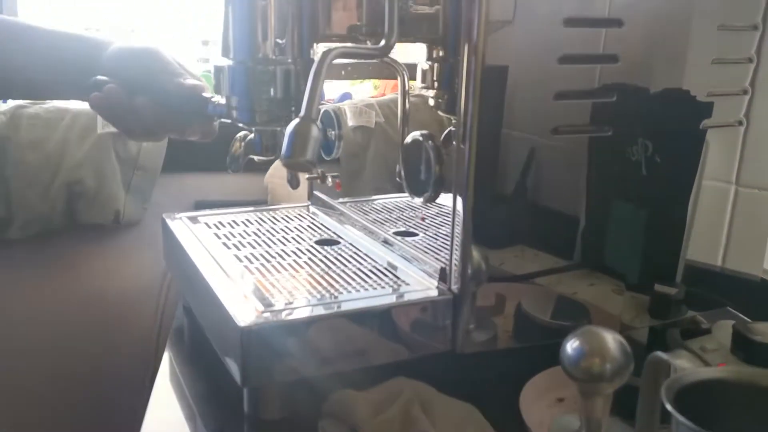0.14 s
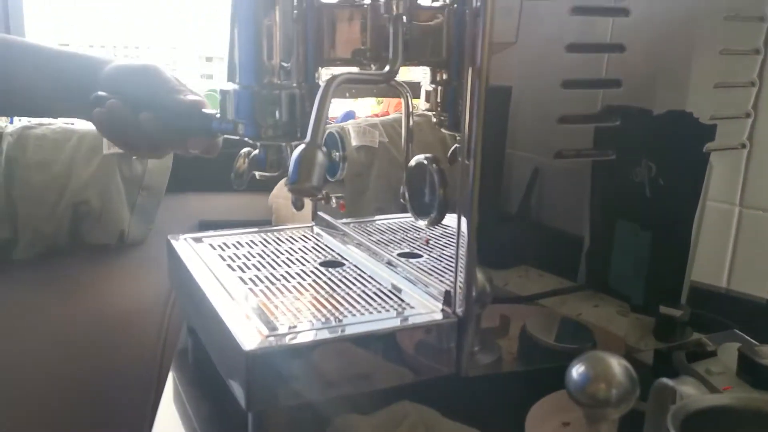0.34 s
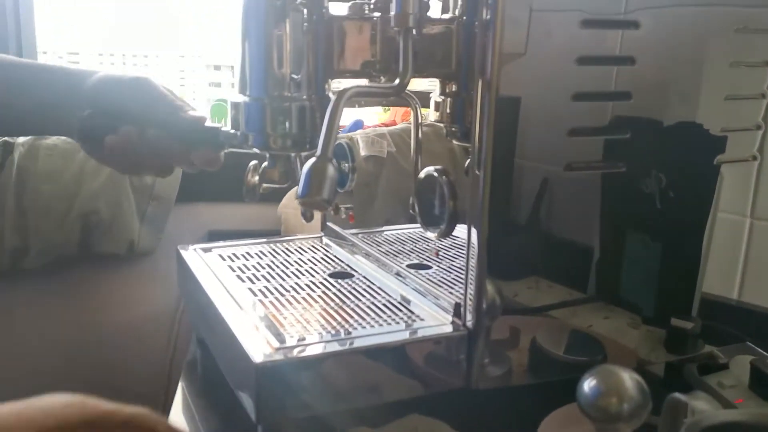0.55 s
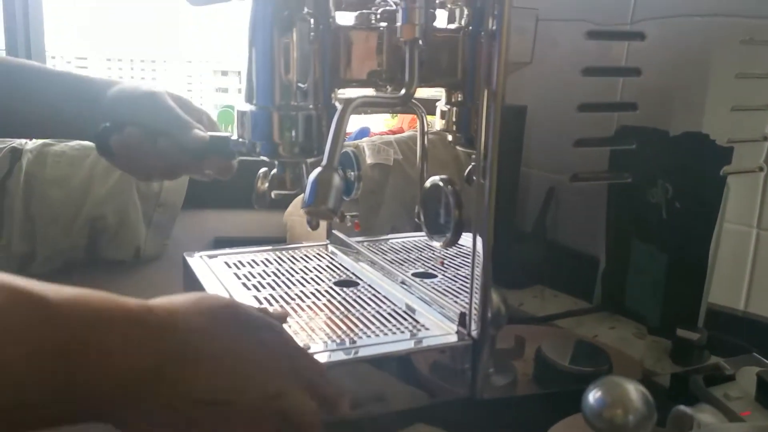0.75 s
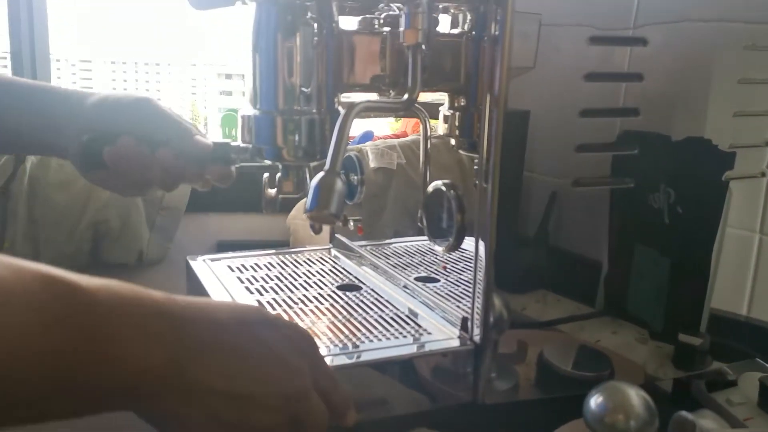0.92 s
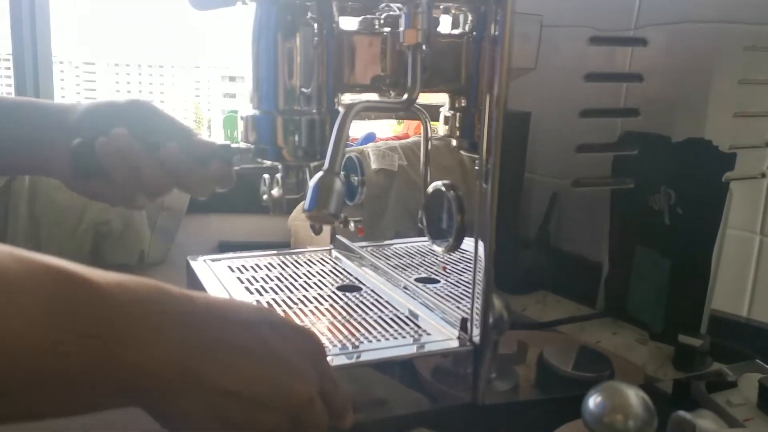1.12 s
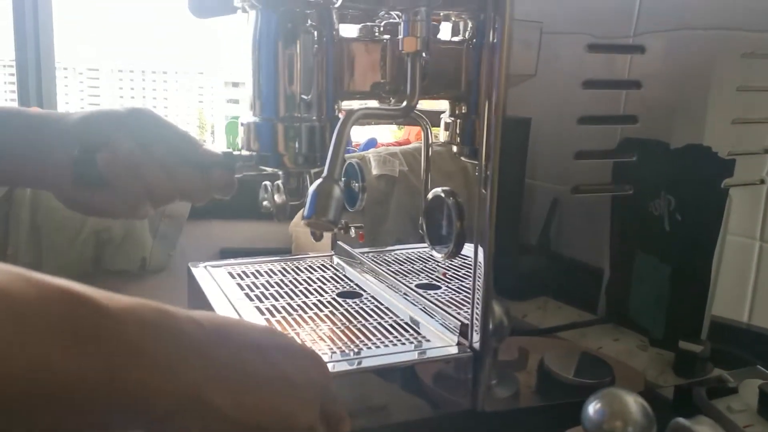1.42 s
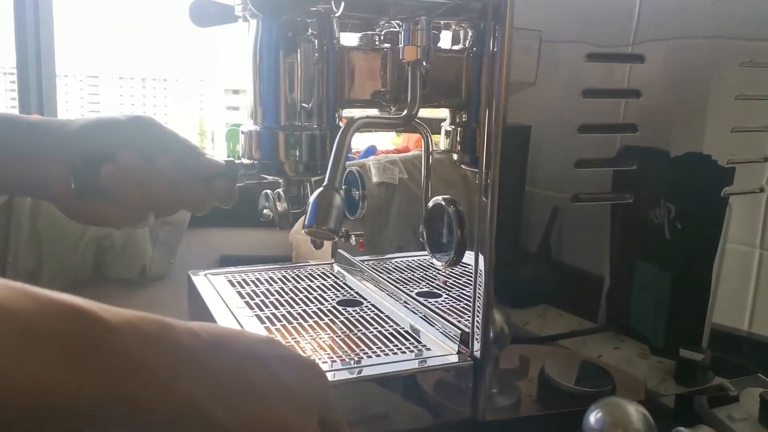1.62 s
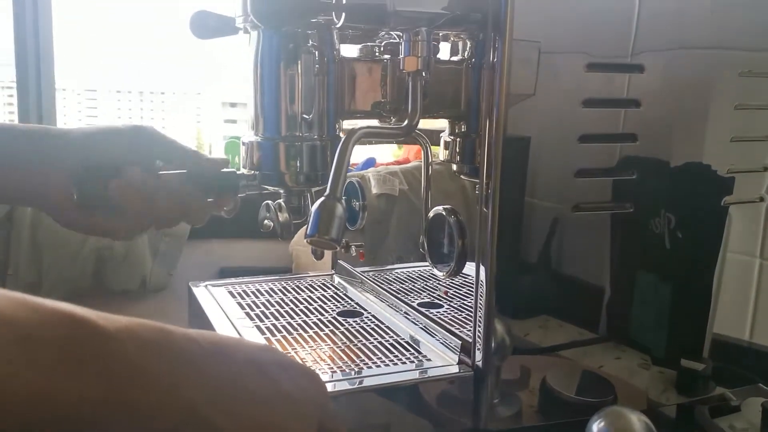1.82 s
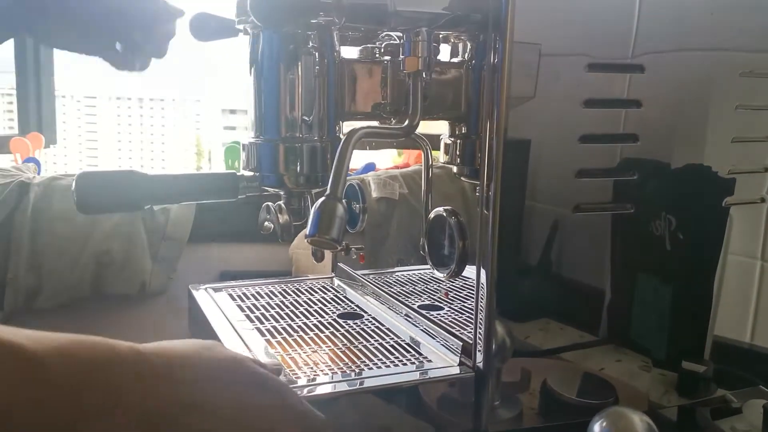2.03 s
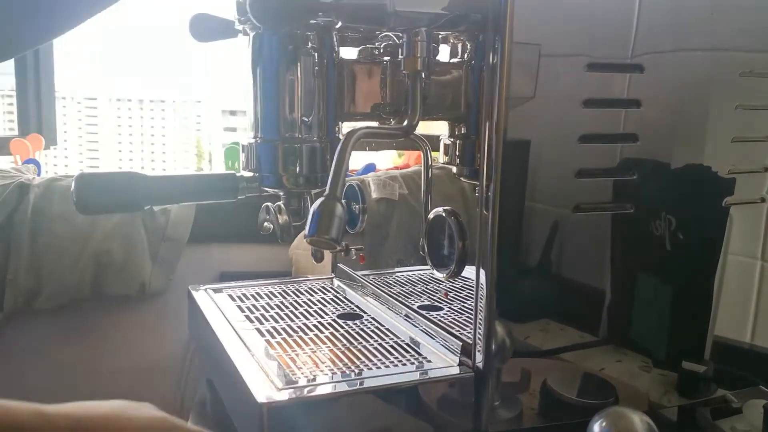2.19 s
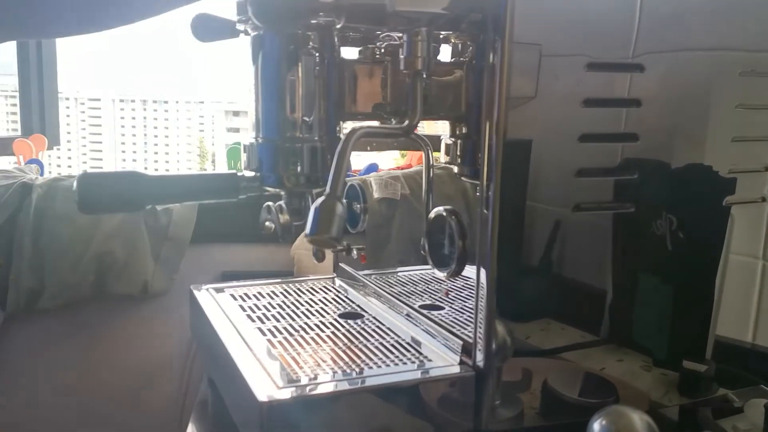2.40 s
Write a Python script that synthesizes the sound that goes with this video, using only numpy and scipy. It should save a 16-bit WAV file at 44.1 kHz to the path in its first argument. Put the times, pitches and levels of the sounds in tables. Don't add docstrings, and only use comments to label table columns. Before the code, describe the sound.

A brass portafilter being fitted to an espresso machine, close in stereo in a quiet kitchen. A light tick at 0.17 s, then a hard clunk at 0.23 and dense rattling to 0.35 with low case booms. At 0.52 it drops home, dull knocks following; soft gasket rubbing and tiny catches fade by 1.5. Dry finger ticks at 1.39 and 1.86, faint skin rustle near 2, town rumble throughout.

```python
import sys
import numpy as np
from scipy import signal
from scipy.fft import rfft, irfft, next_fast_len
from scipy.io import wavfile
from scipy.ndimage import uniform_filter1d, map_coordinates

SR = 44100
rng = np.random.default_rng(int(sys.argv[2]) if len(sys.argv) > 2 else 0)


def invert_db(x):
    u = np.asarray(x, float) / 20
    return 10 ** u


def waveform_to_disk(signal):
    frames = np.transpose(np.atleast_2d(signal))
    scaled = np.clip(frames, -1, 1) * 32767
    samples = np.round(scaled).astype(np.int16)
    wavfile.write(sys.argv[1], SR, samples)


N = 112454

# pitch_hz, level_db
TOWN_SPECTRUM = [(12, -59.5), (24, -3.5), (48, 1), (70, -7.5), (141, -6.5), (190, -6), (300, -8.5),
                 (489, -15), (1500, -27), (1950, -70), (3300, -120)]
# pitch_hz, level_db
AIR_SPECTRUM = [(800, -34.5), (1500, 5.5), (3000, -1.5), (5000, -6.5), (7300, -4), (8000, -7), (10500, 8.5),
                (15000, 1.5)]
# start_s (middle), spread_s, level_db
BIRD_CALLS = [
    (.09, 0.09, -77),
    (.45, 0.068, -79.5),
    (1.67, 0.038, -83),
    (1.91, 0.023, -78),
]
# start_s, peak_db, crack_share, brightness_db_per_octave
RIM_HITS = [
    (.1745, -39.5, 0.3, -11.5),
    (0.1765, -24.5, 0.47, 2.5),
    (.183, -38.5, .2, 1),
    (.19, -39, .3, -6.5),
]
# pitch_hz, level_db, t60_s
RIM_MODES = [(1315, -13, 0.074), (1510, -5.5, 0.054), (2400, -10, 0.026), (3430, -12, 0.05),
             (4190, -4, 0.062), (5490, -1, 0.025), (6546, -14, .05), (7900, -5, .03), (13800, 0, 0.021)]
# start_s, level_db, pitch_hz, t60_s
PANEL_PUSHES = [(.222, -39, 181, 0.45), (.226, -39.5, 250, 0.24), (.245, -38, 538, .2),
                (.265, -43.5, 96, 0.28), (.278, -31, 279, .12), (.3, -42.5, 421, 0.11),
                (.3, -37.5, 46, 0.24), (.315, -30, 185, 0.21), (0.339, -38, 273, 0.15),
                (0.377, -35, 193, 0.11), (.4, -42.5, 273, .15), (.41, -44.5, 201.3, 0.65),
                (0.421, -43, 86.5, .2), (.51, -40, 190, 0.12), (0.514, -39, 316, 0.083),
                (0.519, -37.5, 240, 0.11), (.55, -41.5, 285.2, 0.38), (0.589, -46.5, 170, 0.096),
                (.74, -47, 199.2, 0.32), (0.899, -45.5, 194, 0.24)]
# start_s, peak_db, crack_share, brightness_db_per_octave
SLOT_HITS = [(0.2237, -21, 1.2, -2), (.2345, -28, 1, 10), (.238, -26, .5, 3.5), (.243, -34, 1, -8),
             (0.251, -30, .6, -7), (0.2605, -19.5, 1, -0.5), (.2635, -28, .6, -1), (.2712, -31, 1, -1),
             (.2835, -19, 0.66, 2.5), (.294, -27.5, 1, -2.5), (.304, -28.5, 0.37, -1.5),
             (.316, -33, 0.37, -5.5), (.326, -35, .4, -6), (.338, -41, 0.5, -3.5), (.352, -40, .4, 0.5)]
# pitch_hz, level_db, t60_s
SLOT_MODES = [(538, -10, 0.07), (671, -3.5, 0.04), (923, -8.5, 0.048), (1204, -4, 0.061), (1391, -5, 0.054),
              (1639, -4.5, 0.046), (1894, -4, 0.05), (2080, -1, 0.039), (2380, -1, 0.047),
              (2824, -8.5, 0.091), (3280, -12.5, 0.063), (4100, -14, 0.082), (5320, -18, .04),
              (5900, -14, .04)]
# start_s, peak_db, crack_share, brightness_db_per_octave
HARD_BLOW = [
    (.2290, -8.5, 0.65, 0),
]
# pitch_hz, level_db, t60_s
LUG_MODES = [(566, -24, 0.039), (676, -2.5, 0.03), (906, -10, .06), (1360, -13.5, 0.067),
             (1410, -10.5, 0.028), (1897, -21, .04), (2120, -6, 0.045), (2294, 1.5, 0.032),
             (2350, -9, 0.029), (2760, -22, .035), (4090, -11, .07), (4630, -23, 0.027),
             (5100, -15.5, 0.069), (6611, -25, .04)]
# pitch_hz, level_db, t60_s
BASKET_MODES = [(9380, 4.5, .12), (10500, -4.5, .06), (11100, 4, .08), (11900, 2, .07), (12800, 1.5, .1),
                (13700, -5, .06), (14600, -4, .04)]
# start_s (middle), spread_s, level_db
SKIN_MOVES = [
    (.405, 0.027, -58),
    (1.5, 0.017, -62.5),
    (1.80, 0.037, -69),
    (1.955, 0.011, -56.5),
    (2.03, 0.066, -62),
]
# pitch_hz, level_db
SKIN_SPECTRUM = [(1200, -14), (2500, 10), (4000, -8), (7000, 3.5), (10000, 16.5), (14000, 10)]
# start_s, level_db
SLIDE_PRESSURE = [(0.519, -58), (0.62, -59.5), (0.768, -56), (.95, -55.5), (1.1, -61.5), (1.34, -60),
                  (1.43, -68), (1.55, -83)]
# pitch_hz, width_hz, level_db
GASKET_BANDS = [(2340, 250, -2), (4210, 310, 3.5), (5360, 310, -1.5), (6340, 800, -7.5), (9050, 1400, 1)]
# start_s (middle), spread_s, pitch_hz, width_hz, level_db
HAND_SQUEAK = (2.16, .06, 12200, 600, -56)
# start_s, peak_db, crack_share, brightness_db_per_octave
SEAT_HITS = [
    (0.5195, -16, 0.35, -0.7),
    (.5252, -23.5, 0.23, -9.5),
    (0.531, -35, 0.32, -4),
    (.538, -40, 0.55, 0),
    (0.548, -41, .4, 3),
    (0.564, -44, .4, -6),
    (0.8878, -44, 0.5, 6),
]
# pitch_hz, level_db, t60_s
SEAT_MODES = [(1255, -0.5, 0.078), (1310, -12, 0.07), (1498, 0.5, 0.032), (1760, -0.5, 0.022),
              (1920, -1.5, .05), (2110, -1, 0.044), (2398, 13, 0.013), (2550, -20, 0.056),
              (3080, -16, 0.0098), (3480, 1.5, 0.025), (3878, -4.5, .07), (4670, -9, 0.033),
              (6260, 1.5, 0.027), (6970, -2.5, 0.032)]
# start_s, peak_db
HANDLE_KNOCKS = [
    (.524, -38.5),
    (.536, -33),
    (.547, -33.5),
    (.558, -36),
    (.567, -38),
    (.58, -54),
    (0.754, -46),
    (.79, -45),
]
# pitch_hz, level_db, t60_s
HANDLE_MODES = [(410, -6, 0.052), (552, -1, 0.05), (741, 6.5, 0.046), (880, -5, 0.052), (977, -2, 0.06),
                (1144, 0, 0.039), (1373, -3, .05)]
# start_s, peak_db, pitch_hz, t60_s
CATCHES = [(0.7628, -40, 5360, 0.027), (0.821, -51, 2970, 0.027), (0.886, -44, 2147, 0.074),
           (.888, -44.5, 2400, 0.046), (0.89, -44.5, 1243, .12), (0.941, -45, 6000, .02),
           (1.4937, -56, 3860, 0.022), (1.79, -58, 6000, 0.018), (1.947, -51, 2610, .03),
           (1.954, -51.5, 6970, 0.039), (2.024, -54.5, 2530, 0.052), (2.03, -59, 5540, 0.037)]
TICK_TIMES = [1.389, 1.3883, 1.3922, 1.3929, 1.3918, 1.86]
# pitch_hz, peak_db, decay_cycles, left_over_right_db
TICKS = [
    (6500, -36, 1.5, -23),
    (2830, -44, 0.73, -6),
    (5880, -25.5, 1.45, -32),
    (2780, -31, 1.8, -36),
    (1670, -31.5, 1.6, -35),
    (7720, -23.5, 3.6, 16),
]
# pitch_hz, level_db
CRACK_SPECTRUM = [(300, -10.5), (900, -5.5), (2200, -6), (3300, -6.5), (6500, -5), (8600, -20.5),
                  (10500, -4), (14000, -2.5)]
# pitch_hz, left_right_likeness
PORT_LIKENESS = [(40, 0.91), (90, 0.83), (160, 1), (900, 0.94), (2500, 0.82), (4300, .05), (9000, 0.046)]
# pitch_hz, t60_s
KITCHEN_DECAY = [(200, 0.39), (1500, 0.3), (4000, 0.13), (8000, 0.14)]
# pitch_hz, level_db
MIC_RESPONSE = [(20, 5), (7400, 3), (8200, -12), (9600, -25), (10300, -29.5), (15000, -32)]


def unit(x):
    return x / np.sqrt(np.mean(x ** 2) + 1e-20)


def along(points, hz):
    f, v = np.transpose(points)
    return np.interp(np.log(hz + 1), np.log(f + 1), v)


def wobble(rate):
    knots = rng.standard_normal(int(N * rate / SR) + 4)
    return map_coordinates(knots, [np.arange(N) * rate / SR])


def filtered(x, response):
    m = next_fast_len(N + SR // 2)
    return irfft(rfft(x, m) * response(np.fft.rfftfreq(m, 1 / SR)), m)[..., :N]


def above(x, low_hz):
    return signal.sosfilt(signal.butter(4, low_hz, "high", fs=SR, output="sos"), x)


def swells(rows):
    t = np.arange(N) / SR
    return sum(invert_db(db) * np.exp(-((t - s) / spread) ** 2) for s, spread, db in rows)


def rush(gain, patchy_db):
    z = signal.stft(rng.standard_normal((2, N)), nperseg=512)[2]
    field = uniform_filter1d(rng.standard_normal(z.shape[1:]), 6, 0)
    field = uniform_filter1d(field, 14, 1)
    pair = signal.istft(z * invert_db(patchy_db * unit(field)), nperseg=512)[1][:, :N]

    def mid_side_gain(hz):
        turn = np.arccos(np.clip(along(PORT_LIKENESS, hz), -1, 1)) / 2
        return gain(hz) * np.array([np.cos(turn), np.sin(turn)])

    mid, side = filtered(pair, mid_side_gain)
    return unit(np.array([mid + side, mid - side]))


def struck(hits, modes, attack_s, rough, scatter_db=1.5):
    longest_t60, crack_t60 = 0.15, 0.024
    out, t = np.zeros(N + SR), np.arange(SR // 4) / SR
    noise = unit(filtered(rng.standard_normal(N), lambda hz: invert_db(along(CRACK_SPECTRUM, hz))))
    hz, level, t60 = np.transpose(modes)[:, :, None]
    t60 = np.minimum(t60, longest_t60 * (2000 / hz) ** 0.5)
    for s, db, crack, tilt_db in hits:
        steps = rng.standard_normal((len(hz), len(t)))
        drift = np.cumsum(steps, 1) * rough * np.sqrt(hz / 2000) / 10
        tilt = tilt_db * np.log2(hz / np.median(hz))
        scatter = scatter_db * np.clip(rng.standard_normal(hz.shape), -1.5, 1.5)
        gain = invert_db(level + tilt + scatter)
        waves = gain * invert_db(-60 * t / t60) * np.sin(2 * np.pi * hz * t + drift)
        ring = waves.sum(0) / np.linalg.norm(gain)
        at = round(s * SR)
        burst = crack * invert_db(-60 * t / crack_t60) * np.roll(noise, -at)[:len(t)]
        out[at:at + len(t)] += invert_db(db - 4.5) * (ring + burst) * (1 - np.exp(-t / attack_s))
    return out[:N]


def background():
    town_gain = invert_db(-54.5 + 0.18 * wobble(2.79))
    town = town_gain * rush(lambda hz: invert_db(along(TOWN_SPECTRUM, hz)), patchy_db=2.0)
    air_gain = invert_db(-66.5 + 5.5 + 1.0 * wobble(2.25))
    air = air_gain * rush(lambda hz: invert_db(along(AIR_SPECTRUM, hz)), patchy_db=-0.5)
    bird = swells(BIRD_CALLS) * rush(lambda hz: 1 / (1 + ((hz - 7470) / 150) ** 4), patchy_db=-0.5)
    return town + air + bird


def rim_ticks():
    waking = RIM_HITS[1:2] + HARD_BLOW + SLOT_HITS[::5] + SEAT_HITS[:1]
    soft = [(s, db - 16.5, 0, 0) for s, db, *_ in waking]
    sheen = struck(soft, BASKET_MODES, 0.0003, 0.14, 4)
    return struck(RIM_HITS, RIM_MODES, 0.00016, 0.7) + sheen


def case_boom():
    s, db, hz, t60 = np.transpose(PANEL_PUSHES)[:, :, None]
    t = np.maximum(np.arange(N) / SR - s, 0)
    rise_s, waver_rad = 0.0047, 1.4
    envelope = invert_db(db - 60 * t / t60) * (1 - np.exp(-t / rise_s))
    return (envelope * np.sin(2 * np.pi * hz * t + waver_rad * wobble(13.91))).sum(0)


def slot_rattle():
    return struck(SLOT_HITS, SLOT_MODES, 0.0006, 0.7, 2.6)


def hard_blow():
    return struck(HARD_BLOW, LUG_MODES, 0.00038, 0.53)


def rustle():
    grains = invert_db(3.8 * wobble(180))
    return swells(SKIN_MOVES) * grains * rush(lambda hz: invert_db(along(SKIN_SPECTRUM, hz)), patchy_db=-0.5)


def gasket_noise(wide):
    def response(f):
        return np.sqrt(sum(invert_db(2 * g) / (1 + ((f - c) / (w * wide) * 2) ** 2) for c, w, g in GASKET_BANDS))

    return rush(response, patchy_db=2.2)


def slide():
    s, db = np.transpose(SLIDE_PRESSURE)
    t = np.arange(N) / SR
    pressure = invert_db(np.interp(t, s, db, left=-120, right=-120) + 0.85 * wobble(11.05))
    tight, loose = gasket_noise(1), gasket_noise(2.2)
    turn = np.interp(t, (1.0, 1.25), [0, np.pi / 2])
    rub = np.cos(turn) * tight + np.sin(turn) * loose
    at, spread, hz, width, level = HAND_SQUEAK
    thin = rush(lambda f: 1 / (1 + ((f - hz) / width * 2) ** 4), patchy_db=-4.0)
    return pressure * rub + swells([(at, spread, level)]) * thin


def seating():
    home = above(struck(SEAT_HITS, SEAT_MODES, 0.0001, 0.7), 1220)
    catches = sum(struck([(s, db, 0.6, 0)], [(hz, 0, t60)], 0.00035, 0.98) for s, db, hz, t60 in CATCHES)
    return home + catches


def handle_settling():
    knocks = [(s, db, 0.3, 0) for s, db in HANDLE_KNOCKS]
    return struck(knocks, HANDLE_MODES, 0.0012, 0.7, 4)


def fingers():
    out, t = np.zeros((2, N)), np.arange(400) / SR
    for s, (hz, db, cycles, pan_db) in zip(TICK_TIMES, TICKS):
        tick = above(-np.sin(2 * np.pi * hz * t) * np.exp(-t * hz / cycles), hz * 0.53)
        port_db = np.minimum(0, [[pan_db], [-pan_db]])
        out[:, round(s * SR):][:, :len(t)] += invert_db(db + 5 + port_db) * tick
    return filtered(above(out, 1000), lambda hz: invert_db(16.5 * np.clip((hz - 7800) / 2500, 0, 1)))


def kitchen(x):
    hz, t, z = signal.stft(rng.standard_normal((2, SR // 2)), SR, nperseg=256)
    z[1] *= np.tan(np.arccos(np.clip(along(PORT_LIKENESS, hz), 0, 1)) / 2)[:, None]
    decay = invert_db(-60 * t / along(KITCHEN_DECAY, hz)[:, None])
    mid, side = signal.istft(z * decay, SR, nperseg=256)[1]
    answer = [mid + side, mid - side] / np.linalg.norm(mid)
    delayed = np.pad(x, (150, 0))[None]
    return signal.fftconvolve(delayed, answer, axes=1)[:, :N]


def ports(x):
    def response(hz):
        turn = np.arccos(np.clip(along(PORT_LIKENESS, hz), 0, 1)) * np.sin(hz / 240) * 0.6
        return np.exp(1j * turn * np.array([[1], [-1]]))

    return filtered(x, response)


def scene():
    metal = [rim_ticks(), slot_rattle(), hard_blow(), seating(), handle_settling()]
    direct = ports(sum(metal) + case_boom())
    room = invert_db(-8) * sum(map(kitchen, metal))
    air = direct + room + slide() + rustle() + background()
    left_db = -0.72
    return air * invert_db([[left_db], [-left_db]]) + fingers()


def roll_off(x):
    return signal.sosfilt(signal.butter(12, 15400, fs=SR, output="sos"), x)


def record(dry):
    mix = filtered(dry, lambda hz: invert_db(along(MIC_RESPONSE, hz)) * (hz < 15300))
    return roll_off(mix)


dry = scene()
out = record(dry)
waveform_to_disk(out)
```